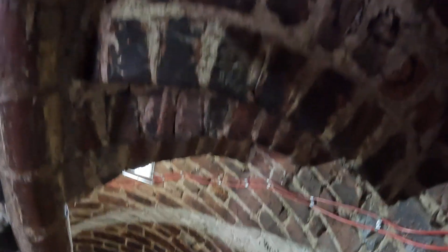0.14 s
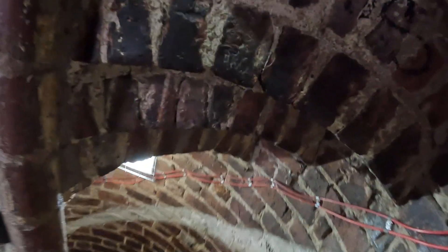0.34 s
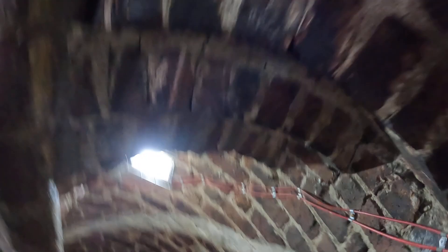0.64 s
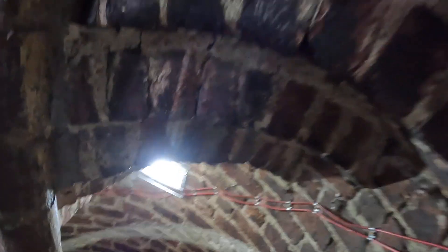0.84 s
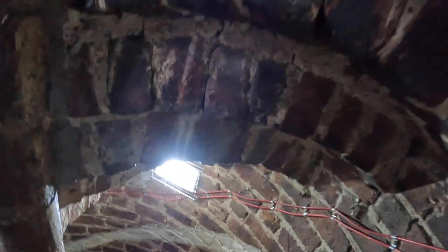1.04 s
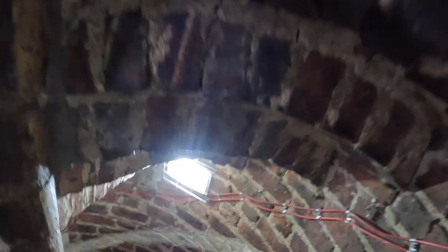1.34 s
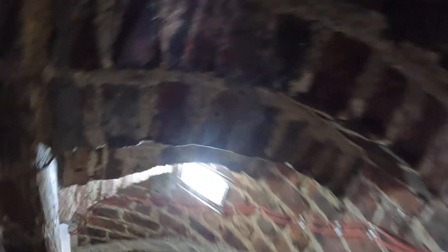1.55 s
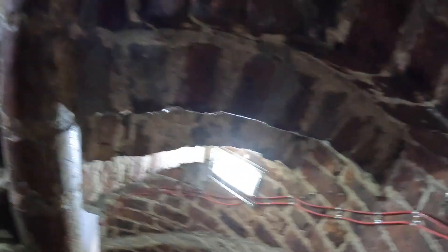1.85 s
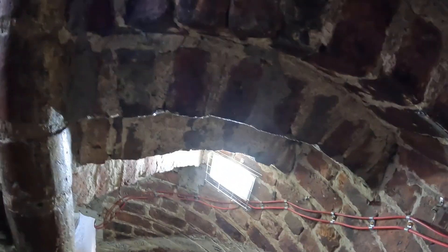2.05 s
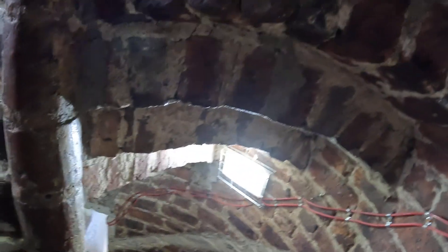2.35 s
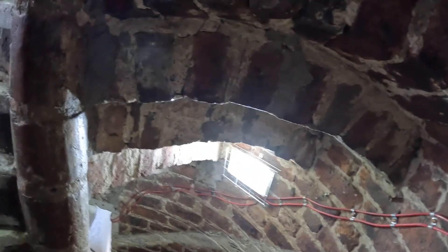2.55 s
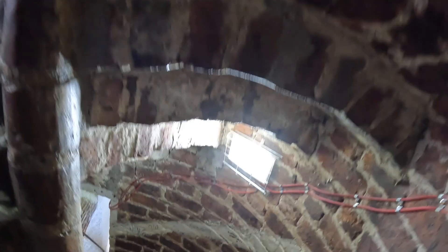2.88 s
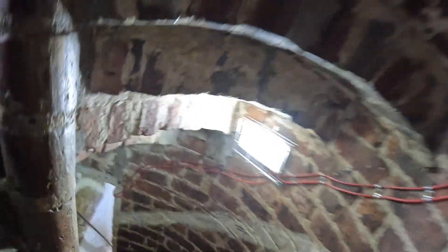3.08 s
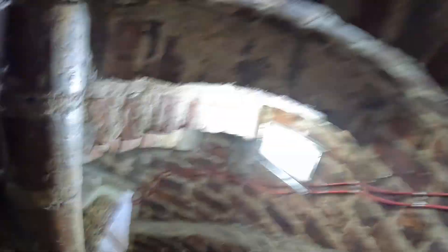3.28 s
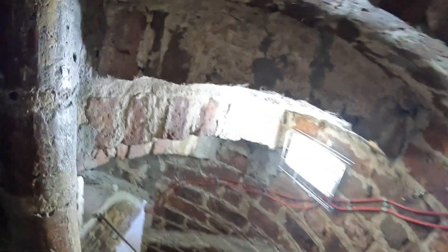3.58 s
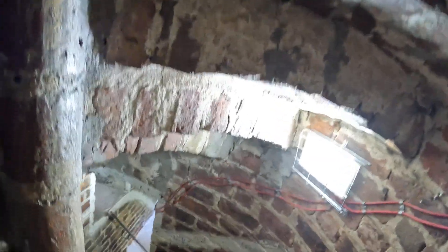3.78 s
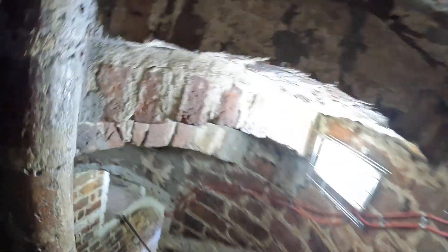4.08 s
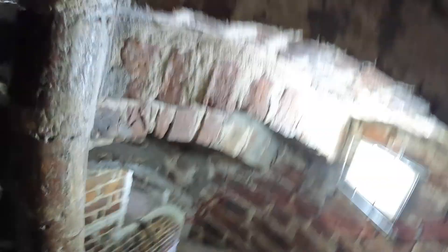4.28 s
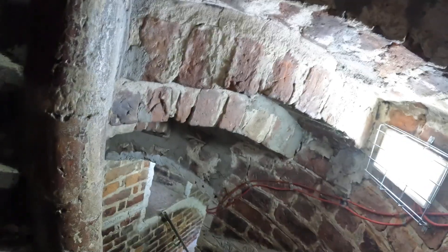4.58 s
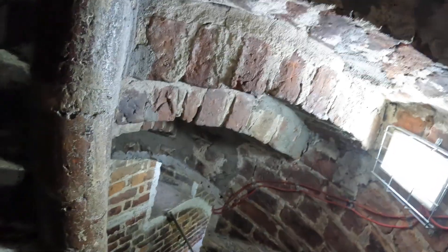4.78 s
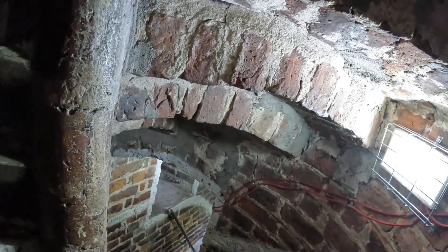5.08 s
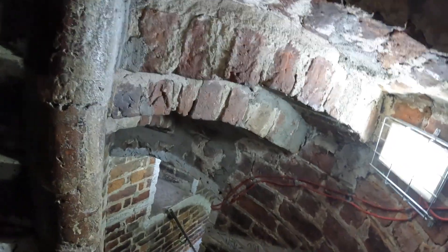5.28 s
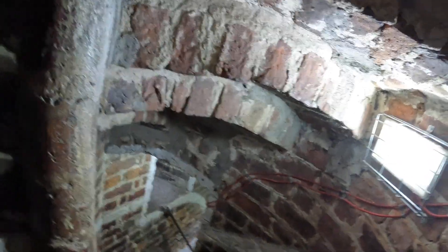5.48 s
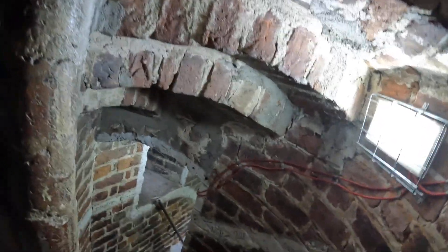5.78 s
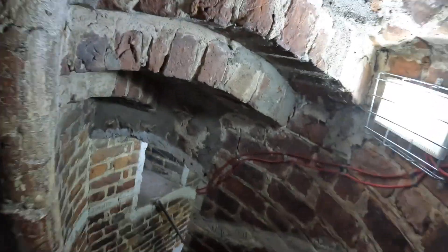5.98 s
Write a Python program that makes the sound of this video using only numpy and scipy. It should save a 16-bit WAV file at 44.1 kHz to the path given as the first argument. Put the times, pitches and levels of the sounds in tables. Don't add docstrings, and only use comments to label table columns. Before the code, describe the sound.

Slow, heavy shoe steps knock and scuff on gritty steps in a narrow brick stairwell, with short boxy echo and low rumble.

```python
import sys
import numpy as np
from scipy import signal
from scipy.fft import rfft, irfft, next_fast_len
from scipy.io import wavfile
from scipy.ndimage import uniform_filter1d, map_coordinates

SR = 44100
rng = np.random.default_rng(int(sys.argv[2]) if len(sys.argv) > 2 else 0)


def gain_from_decibels(decibels):
    exponent = np.asarray(decibels, float) / 20
    return 10 ** exponent


def to_wav(sig):
    pcm = np.clip(np.atleast_2d(sig), -1, 1) * 32767
    pcm = np.round(pcm).astype(np.int16)
    wavfile.write(sys.argv[1], SR, pcm.T)


N = 270333

# t/s, knock peak level/dB, thud re knock/dB, hard clack re knock/dB, knock pitch f/Hz
HEELS = [
    (0.561, -29, 4, 4.5, 693),
    (1.669, -21.5, 2.5, -1, 507),
    (3.209, -23.5, -6.5, -1, 346),
    (4.2698, -15.5, -6, -10.5, 380),
    (6.0107, -17, -16.5, -12.5, 321),
]


def unit(x):
    return x / np.sqrt(np.mean(x ** 2) + 1e-20)


def peak(x):
    return x / np.abs(x).max()


def along(points, hz):
    f, v = np.transpose(points)
    return np.interp(np.log(hz + 1), np.log(f + 1), v)


def curves(rows):
    s, *cols = np.transpose(rows)
    return [np.interp(np.arange(N) / SR, s, c) for c in cols]


def wobble(rate):
    knots = rng.standard_normal(int(N * rate / SR) + 4)
    return map_coordinates(knots, [np.arange(N) * rate / SR])


def filtered(x, response):
    size = x.shape[-1]
    m = next_fast_len(size + min(size // 2, SR // 4))
    return irfft(rfft(x, m) * response(np.fft.rfftfreq(m, 1 / SR)), m)[..., :size]


def modes(table):
    def response(f):
        total = 0
        for k, (centre, width, db) in enumerate(table):
            ring = 1j * f * width / (centre * centre - f * f + 1j * f * width)
            total = total + (-1) ** k * gain_from_decibels(db) * ring
        return total
    return response


def spread(pair):
    # f/Hz, left-right likeness (1 = the same)
    alike = [(30, 0.83), (70, 0.98), (150, 0.99), (300, 0.86), (600, 0.71), (1200, 0.71), (2400, 0.39),
             (5000, 0.77), (9000, 0.62), (13000, 0.23)]

    def middle_and_side(hz):
        angle = np.arccos(np.clip(along(alike, hz), -1, 1)) / 2
        return np.array([np.cos(angle), np.sin(angle)])
    mid, side = filtered(pair, middle_and_side)
    return np.array([mid + side, mid - side])


def rush(spectrum, patchy_db):
    z = signal.stft(rng.standard_normal((2, N)), nperseg=512)[2]
    field = uniform_filter1d(rng.standard_normal(z.shape[1:]), 5, 0)
    field = uniform_filter1d(field, 10, 1)
    pair = signal.istft(z * gain_from_decibels(patchy_db * unit(field)), nperseg=512)[1][:, :N]
    return unit(spread(filtered(pair, lambda hz: gain_from_decibels(along(spectrum, hz)))))


def steadied(x, span_s):
    power = uniform_filter1d(np.mean(x ** 2, axis=0), round(span_s * SR))
    return unit(x / np.sqrt(np.abs(power) + 0.039))


def swells(rows, rest_db):
    t = np.arange(0, N + 32, 32) / SR
    power = gain_from_decibels(rest_db) ** 2
    for s, db, rise, fall in rows:
        drop_db = 20 * np.maximum((s - t) / abs(rise), (t - s) / abs(fall))
        power = power + gain_from_decibels(db - drop_db) ** 2
    return np.interp(np.arange(N) / SR, t, 10 * np.log10(power))


def contacts():
    # t/s, knock peak level/dB, thud re knock/dB, clack re knock/dB, knock pitch f/Hz
    soles = [(0.584, -34, 2, 0, 357), (0.606, -24.5, -3, -4.5, 470), (0.634, -33.5, 8, -7, 650),
             (0.659, -33, 4, -24, 333), (0.721, -43.5, 9, 3, 500), (1.696, -22.5, -4.5, -5.5, 540),
             (1.711, -20.5, -5.5, 1, 596), (1.734, -23, -6, -4, 500), (1.749, -33, 6, 2, 480),
             (1.789, -44, 1, -19, 460.2), (1.829, -47.5, 6, -9, 398), (3.269, -26, -9, -14, 447),
             (3.3, -32.5, -16.5, -7, 600), (3.344, -38, -7, 3.5, 474), (3.379, -49, 1, -3, 497),
             (4.315, -19.5, -6.5, -12, 500), (4.322, -19.5, -1.5, -2.5, 415), (4.334, -33, -28, -15, 514),
             (4.367, -30.5, -18, -1.5, 330), (4.39, -34.5, 5, -15, 285), (6.02, -24, -11.5, -7.5, 416),
             (6.042, -31, -4, -8, 296), (6.093, -21, -14, -5, 307), (6.103, -22.5, -20, -4, 278),
             (6.119, -32, -15, -2, 300)]
    # t/s, knock peak level/dB, thud re knock/dB, clack re knock/dB, knock pitch f/Hz
    shuffles = [(0.096, -36.5, 5.5, -23, 353), (0.123, -49, 6, -3, 380), (0.957, -55.5, 22.5, -19, 560),
                (2.069, -40.5, -16, -11, 478), (2.204, -43.5, 7, 1, 288), (2.313, -42.5, 6, -4, 470),
                (2.38, -39, 1.5, 4, 397), (2.413, -37, 1, -22.5, 290), (2.459, -42.5, -2, -6, 465),
                (4.616, -47.5, -15, 4.5, 695), (5.297, -41, -6, -12, 323), (5.315, -47.5, -3, -22, 324),
                (5.365, -42, -5, -22, 275), (5.386, -44, -2, 0, 313), (5.471, -56.5, -7, 13, 385),
                (5.995, -46.5, 10, -21, 250), (6.08, -38, 2, -4, 300)]
    touches = []
    for rows, base_s in [(HEELS, 0.0067), (soles, 0.0051), (shuffles, 0.0069)]:
        for row in rows:
            db, thud_db = row[1], row[2]
            length_s = base_s * gain_from_decibels(0.18 * thud_db - 0.16 * (db + 30))
            touches.append((*row, length_s))
    return sorted(touches)


def shaft(size):
    # f/Hz, time to fall by 60 dB t/s
    echo_t60 = [(60, 0.37), (160, 0.39), (420, 0.31), (1100, 0.3), (3000, 0.25), (8000, 0.22)]
    hz, t, z = signal.stft(rng.standard_normal((2, size)), SR, nperseg=256)
    fading = z * gain_from_decibels(-60 * t / along(echo_t60, hz)[:, None])
    tail = signal.istft(fading, SR, nperseg=256)[1][:, :size]
    return tail / np.linalg.norm(tail[0])


def background():
    # t/s, rumble level/dB, left-right difference/dB
    air = [(0.0, -42, 0), (0.2, -40.5, -8.5), (0.63, -35.5, 2.5), (1.19, -42, -4), (1.64, -31.5, -3.5),
           (1.74, -35, 6), (1.78, -35.5, -11), (1.94, -39.5, 6), (2.05, -41, -9), (3.09, -38.5, 4),
           (3.12, -43, -12), (3.3, -30, 0), (3.55, -41, -5.5), (4.23, -39.5, -5.5), (4.27, -28, -1),
           (4.66, -45.5, -2), (5.99, -37.5, 1.5), (6.13, -33, -6)]
    # t/s, level/dB
    outside = [(0, -51), (.2, -56.5), (1.1, -61), (1.6, -62), (2.1, -60.5), (2.3, -49.5), (2.62, -58.5),
               (2.85, -55), (3.15, -55.5), (3.7, -56), (4.1, -60.5), (4.6, -57), (5.05, -64), (5.45, -54.5),
               (5.75, -54), (6.13, -53)]
    # f/Hz, level per Hz/dB
    rumble_spectrum = [(8.8, -5), (15, 9.5), (42, -1), (90, -16), (120, -16), (200, -120)]
    # f/Hz, level per Hz/dB
    hum_spectrum = [(60, -8.5), (86, -10.5), (104, -6.5), (115, -13), (126, 0), (150, -8), (200, -16.5),
                    (260, -35.5), (340, -27.5), (570, -120)]
    # f/Hz, level per Hz/dB
    street_spectrum = [(130, -21), (220, 1), (285, -6), (333, -3), (377, -8), (473, -2.5), (546, -13.5),
                       (593, -10.5), (834, -18), (1030, -10.5), (1270, -9), (2600, -21.5), (3380, -29.5),
                       (5720, -120)]
    # f/Hz, level per Hz/dB
    hiss_spectrum = [(1060, -55), (1800, -7), (3140, -14), (3710, -10), (6180, -10), (6960, -10),
                     (8910, -22.5), (10100, -25), (11300, -24), (12500, -17), (16000, -43)]
    # t/s, level/dB
    far_steps = [(1.2, -42), (1.4, -41), (2.03, -35), (2.8, -38), (3.05, -44), (3.6, -41), (4.0, -43.5),
                 (5.33, -48)]

    gust_db, lean_db = curves(air)
    open_db, = curves(outside)
    sides_db = np.array([lean_db, -lean_db]) / 2
    rumble = gain_from_decibels(gust_db + 1.5 + sides_db) * steadied(rush(rumble_spectrum, patchy_db=0.5), span_s=0.106)

    rise_s, fall_s, ceiling_db = 0.043, 0.14, -36.5
    stirs = [(s, db, rise_s, fall_s) for s, db in far_steps]
    for s, db, thud_db, *_ in contacts():
        stirs.append((s + rise_s, min(db + thud_db - 4.5, ceiling_db), rise_s, fall_s))
    swell_db = swells(stirs, rest_db=-47) + 0.28 * (open_db - open_db.mean()) + 2.1 * wobble(9)
    swell_db = np.minimum(swell_db, ceiling_db)
    hum = gain_from_decibels(swell_db - 1.5) * steadied(rush(hum_spectrum, patchy_db=1.5), span_s=0.073)

    glow_db = swells([(s + 0.11, -52, 0.1, 0.66) for s, *_ in HEELS], rest_db=-90)
    murmur = unit(gain_from_decibels(1.2 * wobble(3.77)) * rush(street_spectrum, patchy_db=0.5))
    street = np.hypot(gain_from_decibels(open_db), gain_from_decibels(glow_db)) * murmur
    hiss = gain_from_decibels(-71) * rush(hiss_spectrum, patchy_db=0.3)
    return rumble + hum + street + hiss


def drag():
    # t/s, level/dB, fall per 20 dB t/s, fine dust re level/dB
    crushes = [
        (.565, -45, 0.11, -29),
        (1.675, -40, 0.1171, -2.5),
        (3.217, -41, 0.225, -9),
        (4.275, -37, 0.1226, -14),
        (6.014, -40.5, 0.06, -5.5),
    ]
    # t/s, level/dB, rise per 20 dB t/s, fall per 20 dB t/s, dust re level/dB
    scuffs = [(.096, -60, -0.6, -0.1, -9), (.128, -56, -0.1, -0.22, -4.5), (.21, -68.5, -4.5, 0.7, -6),
              (.54, -60.5, 0.1, 0.4, -9), (2.034, -73, 1, -1, -14), (2.204, -60, -0.06, 0.25, -7),
              (2.382, -59.5, -1.6, 0.44, -7), (3.19, -52, 0.2, 0.6, -12), (3.258, -43.5, 0.0354, 0.19, 0),
              (3.355, -50, 0.15, 0.43, -8), (4.367, -47, 0.26, 0.1557, -6), (5.403, -58.5, .1, 0.2, -6),
              (5.485, -50.5, 0.09, 0.07, -12), (6.0, -48.5, -0.1, 1, -3.5), (1.715, -44.5, 0.1, 0.06, -9),
              (1.77, -46.5, .1, 0.01, -8), (.61, -48.5, -0.11, 0.14, -14), (5.33, -64.5, 0.25, -0.1, -3.5),
              (6.102, -42.5, 0.05, .2, -10)]
    # t/s, level/dB, rise per 20 dB t/s, fall per 20 dB t/s, dust re level/dB
    slides = [(.05, -62.5, 3, 0, -23), (.32, -64.5, -1.5, 2, -14), (.8, -55.5, 0.83, .5, -11),
              (1.131, -56, 0.2, 0, -10.5), (1.39, -51.5, 0.2, 0.5, -19), (1.501, -50.5, 0.33, 0.05, -2),
              (1.64, -58, 0.2158, 0.03, -3), (1.82, -56, 1.7, 0.23, -14), (2.47, -60.5, -0.1, 2.3, -14),
              (2.86, -58.5, 0.17, 1.5, -9.5), (3.785, -58.5, 0.7, 0.5, -14), (4.09, -53, 0.18, .5, -3.5),
              (4.241, -50.5, 0.28, 0.13, -2), (4.6, -60, 2, 0.47, -14), (5.7, -57.5, 0.75, 4, -7.5)]
    # start t/s, length t/s, first f/Hz, last f/Hz, lift level/dB
    swish = [
        (1.1, 0.48, 1488, 8560, 4.5),
        (3.244, 0.34, 5600, 4100, 5),
        (4, 0.29, 6470, 6300, 6),
    ]
    # f/Hz, level per Hz/dB
    grit_spectrum = [(820, -8.5), (1400, 0.5), (1780, 0.5), (2560, -1), (2780, -0.5), (3010, -2),
                     (3510, -2), (6240, -7.5), (8000, -18.5), (10400, -36), (17600, -120)]
    # f/Hz, level per Hz/dB
    dust_spectrum = [(4410, -12), (7500, -3.5), (8280, -12), (10300, -10), (11200, -14), (12400, -12),
                     (15700, -33)]

    strokes = [(s, db, 0.0018, fall, dust) for s, db, fall, dust in crushes]
    strokes = [*strokes, *scuffs, *slides]
    level_db = swells([row[:4] for row in strokes], rest_db=-85)
    dust_rows = [(s + 0.0021, db + dust, rise, fall) for s, db, rise, fall, dust in strokes]
    dust_db = swells(dust_rows, rest_db=-81.5)
    grains = gain_from_decibels(0.6 * wobble(300) + 1.38 * wobble(40))

    hz, t, z = signal.stft(grains * rush(grit_spectrum, patchy_db=2.0), SR, nperseg=512)
    for s, length, first_hz, last_hz, lift_db in swish:
        u = np.clip((t - s) / length, 0, 1)
        centre_hz = first_hz * (last_hz / first_hz) ** u
        band = np.exp(-(np.log((hz[:, None] + 1) / centre_hz) / 0.2) ** 2)
        z = z * gain_from_decibels(lift_db * np.sqrt(np.abs(np.sin(np.pi * u))) * band)
    grit = unit(signal.istft(z, SR, nperseg=512)[1][:, :N])
    dust = unit(grains * rush(dust_spectrum, patchy_db=1.3))
    return gain_from_decibels(level_db + 0.87) * grit + gain_from_decibels(dust_db + 1.0) * dust


def ticks():
    # t/s, peak level/dB, pitch f/Hz, ring time to fall by 60 dB t/s, broad snap re ring/dB
    cracks = [(0.0945, -50.5, 6500, .012, 6.5), (0.386, -50, 2910, 0.0082, 3.5),
              (0.559, -41.5, 3570, 0.052, 9), (0.56, -40.5, 6250, 0.013, -1), (0.585, -50, 4800, .012, -5),
              (.607, -41, 2100, 0.017, -6), (1.668, -43, 4320, 0.021, 7.5),
              (1.675, -36.5, 3270, 0.033, -24), (1.712, -48, 3080, .015, -5),
              (2.0695, -46, 1000, 0.008, -13), (2.204, -46, 1400, 0.016, -5), (2.314, -50, 1900, 0.03, -14),
              (2.382, -51.5, 2580, 0.014, 2), (2.383, -46, 1200, 0.023, -15), (2.467, -52, 2100, 0.035, -8),
              (2.846, -67, 3190, .01, 8.5), (3.209, -39.5, 3460, 0.034, 7), (3.21, -37, 2500, .02, -17),
              (3.358, -42, 1240, .025, -8), (3.445, -42, 13500, 0.009, -7), (4.268, -35, 4860, 0.043, 7),
              (5.405, -52, 2500, 0.027, -8), (5.468, -49.5, 2340, 0.082, -7), (5.653, -56, 10600, .012, -4),
              (5.656, -47, 4200, .013, 3), (5.695, -63, 11800, .012, -22),
              (5.872, -38, 3000, 0.0084, -26.5), (6.0085, -41.5, 2910, 0.045, 5),
              (6.01, -47, 5100, .025, -15), (6.049, -46, 4200, .02, -12), (6.098, -42, 5700, 0.016, -2),
              (6.103, -41, 4770, 0.019, -11)]
    # f/Hz, level per Hz/dB
    snap_spectrum = [(880, -16), (1500, 3.5), (3770, 9), (5020, 5), (7170, -5), (8320, -24), (11700, -30),
                     (13300, -30), (16000, -55)]
    out, t = np.zeros((2, N + SR)), np.arange(SR // 10) / SR
    for s, db, hz, t60, snap_db in cracks:
        snap_t60 = 1.04 * t60 * gain_from_decibels(0.96 * max(snap_db, 0))
        waver = np.cumsum(rng.normal(0, 0.04, len(t)))
        ring = np.sin(2 * np.pi * hz * t + waver) * gain_from_decibels(-60 * t / t60) * (1 - np.exp(-t / 0.00017))
        noise = rng.standard_normal((2, len(t)))
        snap = unit(filtered(noise, lambda f: gain_from_decibels(along(snap_spectrum, f))))
        snap = snap * gain_from_decibels(snap_db - 8.5 - 60 * t / snap_t60)
        ring_pair = ring * np.array([[1], [0]])
        out[:, round(s * SR):][:, :len(t)] += gain_from_decibels(db + 6.0) * (ring_pair + snap)
    return spread(out[:, :N])


def steps():
    # f/Hz, width f/Hz, level/dB
    air_modes = [(42, 87, -11), (119.3, 14.2, 12.5), (171, 31, -2.5)]
    # f/Hz, width f/Hz, level/dB
    tread = [(206, 66, 0.5), (336, 160, -2.5), (500, 226, -7), (600, 144, -7)]
    # f/Hz, width f/Hz, level/dB
    edge = [(810, 440, -13), (1013, 190, 7), (1370, 260, 3.5), (2100, 960, -4.5)]

    size = SR // 3
    pair, t = np.zeros((2, N + size)), np.arange(size // 2) / SR
    push = -t / 0.003 * np.exp(-t / 0.0028)
    thud = peak(filtered(push, modes(air_modes)))
    first_touch = t / 0.00024 * np.exp(-t / 0.00016)
    for s, db, thud_db, clack_db, knock_hz, length in contacts():
        bumps_db = 3.4 * rng.standard_normal((2, len(t) // 40 + 1)).repeat(40, axis=1)[:, :len(t)]
        grains = rng.standard_normal((2, len(t))) * gain_from_decibels(bumps_db)
        fade = np.exp(-t / np.clip(length, 0.001, 0.06)) * (1 - np.exp(-t / 0.0011))
        burst = grains * fade + 2.3 * first_touch

        body = modes([*tread, (knock_hz, 90, 2.5)])
        knock = peak(filtered(burst[0], lambda hz: body(hz) / (1 + 1j * hz / 2400) ** 2))
        clack = peak(filtered(burst[1], lambda hz: modes(edge)(hz) / (1 + 1j * hz / 5460) ** 2))
        direct = gain_from_decibels(thud_db + 1.5) * thud + knock + gain_from_decibels(clack_db - 2.5) * clack
        direct = gain_from_decibels(db + 2.5) * direct

        delayed = np.pad(direct, (130, 0))[None]
        echo = signal.fftconvolve(delayed, shaft(size), axes=1)[:, :size]
        start = round(s * SR)
        pair[:, start:start + size] += gain_from_decibels(-4.0) * echo
        pair[0, start:start + len(t)] += direct
    return spread(pair[:, :N])


def jolts():
    # t/s, peak level/dB, swing f/Hz
    bumps = [
        (0.096, -23.5, 83),
        (.277, -26.5, 34.8),
        (2.517, -28, 32.2),
        (3.31, -26.5, 35),
        (5.607, -29, 29.8),
        (6.095, -15, 52),
    ]
    out, t = np.zeros(N + SR), np.arange(SR // 5) / SR
    for s, db, hz in bumps:
        swing = np.sin(2 * np.pi * hz * t) * hz * t * np.exp(-2.5 * hz * t)
        out[round(s * SR):][:len(t)] -= gain_from_decibels(db + 16) * swing
    return out[:N]


def rubs():
    twists = [(0.606, 0.014, -23.5, 1095, 970), (5.464, 0.042, -46.5, 1590, 1800),
              (1, .045, -49.5, 1400, 1200), (1.9, .045, -57, 2900, 3600), (4.195, .07, -45, 2200, 1600),
              (1.695, 0.047, -28, 1000, 880), (1.671, 0.065, -24.5, 529, 450), (1.9, 0.14, -53, 250, 360),
              (3.238, 0.0508, -28.5, 1000, 1293), (3.33, 0.053, -32.5, 437, 500),
              (6.012, 0.024, -27, 2100, 2200), (6.096, .02, -36, 1800, 1100)]
    out = np.zeros(N)
    for s, length, db, first_hz, last_hz in twists:
        width_hz = 203 * (first_hz / 1000) ** 1.44
        u = np.arange(round(length * SR)) / (length * SR)
        jitter = rng.normal(0, np.sqrt(2 * np.pi * abs(width_hz) / SR), len(u))
        glide_hz = first_hz + (last_hz - first_hz) * u
        tone = np.sin(np.cumsum(2 * np.pi * glide_hz / SR + jitter))
        out[round(s * SR):][:len(u)] += gain_from_decibels(db - 1.0) * tone * np.sqrt(np.sin(np.pi * u))

    def sole(hz):
        low_cut = (hz / 300) ** 2 / (1 + (hz / 300) ** 2)
        return low_cut / (1 + (hz / 2200) ** 4)
    out = filtered(out, sole)
    echo = signal.fftconvolve(out[None], shaft(SR // 3), axes=1)[:, :N]
    return out + gain_from_decibels(-7.5) * spread(echo)


def scene():
    return background() + drag() + ticks() + steps() + jolts() + rubs()


def top_cut(x):
    return signal.sosfilt(signal.butter(12, 16430, fs=SR, output="sos"), x)


def record(dry):
    # f/Hz, left-right difference/dB
    lean = [(60, 1.4), (125, 0), (250, 1.1), (500, 1), (1200, 3.5), (4000, 2), (8000, 2.5), (10500, 3.5),
            (13000, 11.5)]

    def microphones(hz):
        top = (hz < 15750) / np.sqrt(1 + (hz / 13900) ** 18)
        return gain_from_decibels(np.array([[0.5], [-0.5]]) * along(lean, hz)) * top
    padded = np.pad(dry, ((0, 0), (0, SR // 10)), "reflect")
    wet = filtered(padded, microphones)[:, :N]
    return top_cut(wet)


dry = scene()
out = record(dry)
to_wav(out)
```